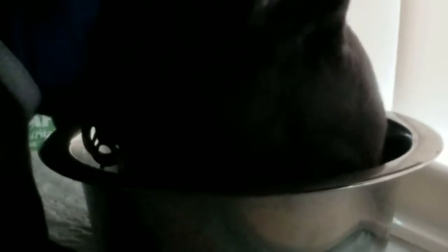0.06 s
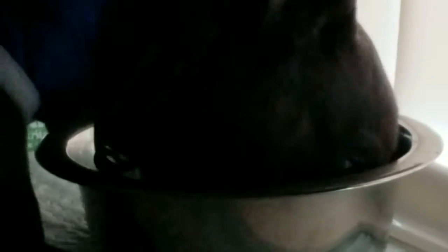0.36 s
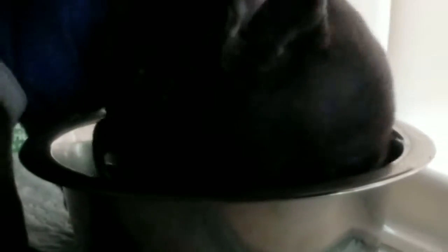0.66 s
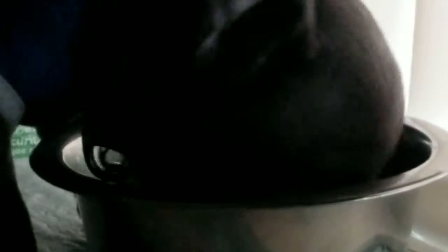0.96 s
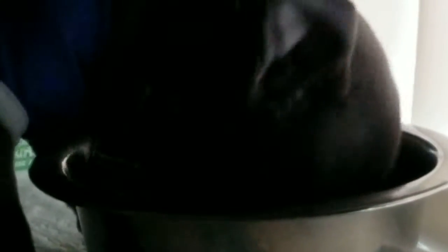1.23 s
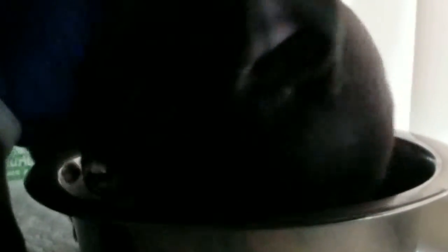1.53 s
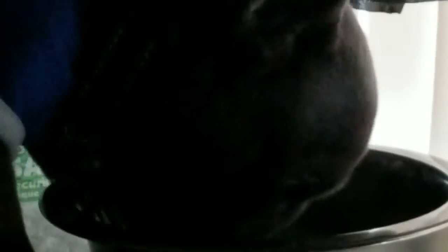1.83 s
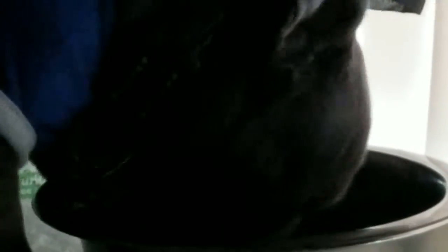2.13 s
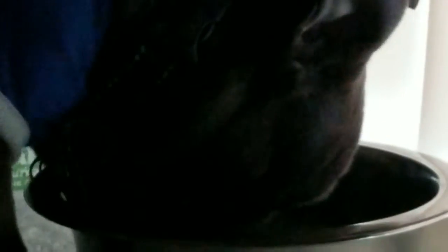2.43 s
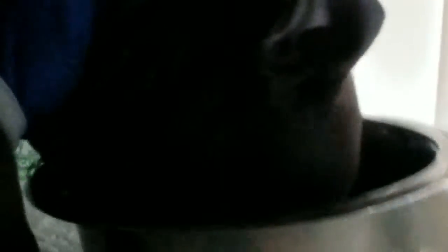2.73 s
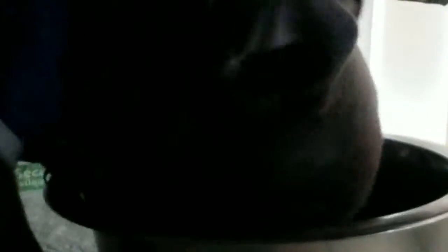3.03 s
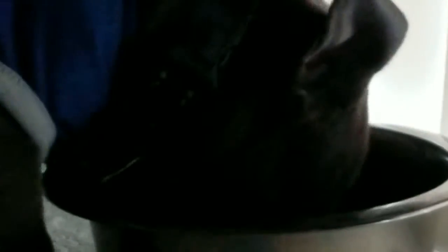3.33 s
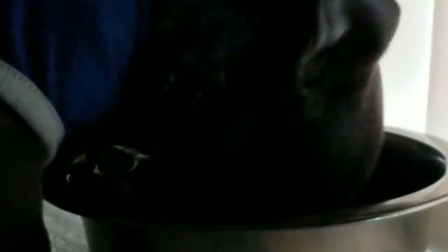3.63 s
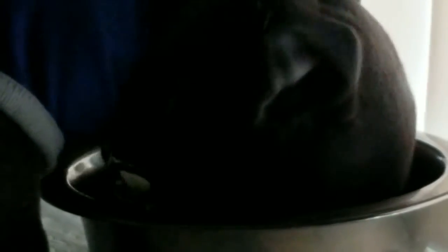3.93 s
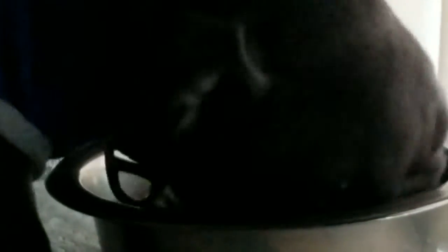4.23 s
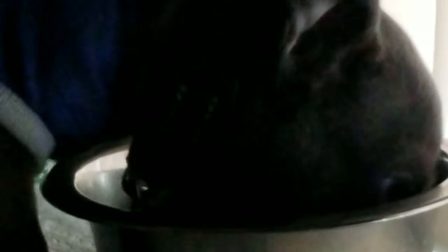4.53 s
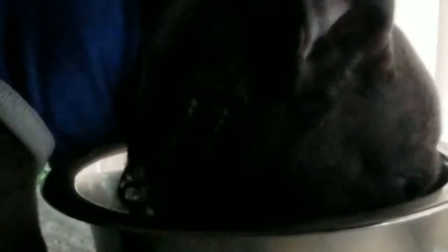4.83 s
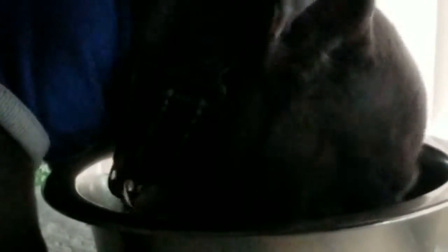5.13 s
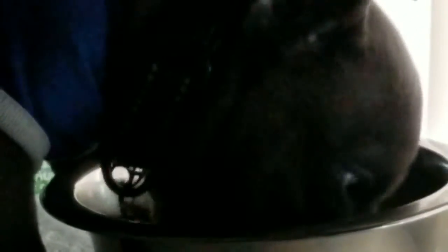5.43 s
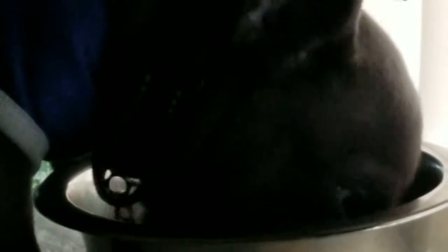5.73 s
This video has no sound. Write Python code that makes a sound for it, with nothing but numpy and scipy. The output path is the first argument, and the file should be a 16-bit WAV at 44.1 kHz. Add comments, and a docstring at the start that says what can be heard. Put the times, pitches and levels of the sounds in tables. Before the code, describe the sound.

In a small, quiet room, a dog laps and nudges food around a steel bowl right by the microphone. Light taps build to a bright clatter of teeth on metal, each knock ringing briefly. Bits of food crack between the teeth, with wet smacks and hollow plops, and then the eating goes on with softer clinks and scrapes.

```python
"""Dog eating from a steel bowl

A small room, with a stereo microphone close to a dog that eats fast from a stainless steel bowl.
Teeth and food clink and scrape on the steel, which rings briefly against the muzzle.
Lips and tongue make hollow plops and wet smacks, and bits of food crack between the teeth."""
import sys
import numpy as np
from scipy import signal
from scipy.fft import rfft, irfft
from scipy.io import wavfile

SR = 44100
rng = np.random.default_rng(int(sys.argv[2]) if len(sys.argv) > 2 else 0)


def dump_mix(stems):
    """Bounce the given channels to the path in sys.argv[1] as a 16-bit WAV at rate SR."""
    frames = np.atleast_2d(stems).T  # one column per channel
    limited = np.clip(frames, -1, 1)  # hard clip at full scale
    pcm = np.round(limited * 32767).astype(np.int16)
    wavfile.write(sys.argv[1], SR, pcm)


N = 254016
TIME = np.arange(N) / SR
RING_TIME = np.arange(SR * 3 // 4) / SR

# Knocks on the steel. Each row: start in seconds, relative clash and ring levels in dB,
# pitch in Hz that the struck spot favours.
KNOCKS = [(0.159, -54, -66, 950), (0.7461, -41, -43, 1940), (0.8003, -44, -39, 2750),
          (0.9073, -37.5, -37, 940), (1.1269, -47.5, -45, 2750), (1.219, -43.5, -40, 1940),
          (1.2978, -39.5, -37, 2750), (1.33, -38, -45, 955), (1.6093, -38.5, -45, 1950),
          (1.6229, -33.5, -27.5, 2230), (1.659, -24.5, -19, 1590), (1.6721, -21, -14, 1900),
          (1.7437, -25.5, -16, 1800), (1.7674, -26, -17, 1810), (1.7907, -25, -24.5, 2720),
          (1.8602, -25.5, -22, 2350), (1.9277, -36, -21.5, 970), (1.946, -26, -31, 2200),
          (2.0973, -38.5, -23.5, 1760), (2.2207, -26, -25, 940), (2.2394, -32, -17, 2220),
          (2.31, -28.5, -26, 1620), (2.8567, -52.5, -33, 2730), (3.4335, -36.5, -35, 920),
          (3.476, -41.5, -30.5, 1800), (3.513, -35, -33.5, 1980), (3.598, -41, -35, 1940),
          (3.663, -36, -26, 1790), (3.7118, -27, -22.5, 1800), (4.0435, -48, -47, 1940),
          (4.3896, -40.5, -25.5, 1810), (4.455, -51, -37, 2600), (4.7648, -40.5, -52, 1940),
          (4.876, -40.5, -38.5, 1800), (5.3261, -37, -50, 2150), (5.3606, -39, -51, 950),
          (5.411, -52, -33, 2750), (5.509, -39.5, -37.5, 1090), (5.583, -45, -44, 1930),
          (5.6436, -43.5, -36, 1940)]
# Modes of the bowl. Each row: frequency in Hz, relative level in dB, t60 in seconds before damping.
BOWL_MODES = [(786.8, 3.5, 0.16), (1005, -19.5, 1), (1126, 0, 0.56), (1939, 0.5, 0.46), (1972, -25, 0.48),
              (1987, -14.5, 0.43), (2563, -1.5, 0.22), (2685, 2, 0.064), (2906, -17, 0.37),
              (3040, -9.5, 0.3), (4000, -29, 1), (4790, -25, 0.71), (5405, -21.5, 0.29), (5480, -27, 0.57),
              (5810, -23, 0.29), (6403, -18, 0.075), (7050, -22.5, .25), (9440, -14.5, 0.12),
              (9748, -14.5, 0.14), (10200, -30, 0.13), (10730, -19.5, 0.29), (10740, -16, 0.4),
              (11418, -33, .2), (14862, -29, 0.14)]
# Hollow of the mouth inside the bowl. Each row: frequency in Hz, relative level in dB.
MOUTH_SPECTRUM = [(120, -23.5), (280, -15), (450, -21), (620, 3), (820, 12), (1200, -1), (2000, -5),
                  (3100, -20.5), (4200, -8), (8000, -18.5), (16000, -50.5)]


def bowl(rub_db=-5, grit_db=-3, lowest_hz=300):
    """Knocks and food pushed along the wall excite the same bowl; its sound carries little bass."""
    # The muzzle shoves food along the steel. Each row: start and length in seconds,
    # relative rubbing and grit levels in dB.
    shoves = [(0.0, 0.037, -62, -69), (0.19, 0.031, -58, -60), (0.48, 0.19, -70, -56),
              (0.747, 0.1, -48, -54), (0.892, 0.056, -43.5, -49.5), (1.114, 0.052, -51, -52),
              (1.253, 0.15, -50, -54), (1.591, 0.056, -46, -39), (1.655, 0.21, -38, -35),
              (1.859, .11, -35, -41), (2.083, 0.039, -40, -43), (2.206, 0.031, -28.5, -27.5),
              (2.28, 0.056, -38.5, -53), (2.6, .09, -52, -61), (2.799, 0.076, -49, -52),
              (2.993, 0.081, -54, -55.5), (3.175, 0.066, -47.5, -55), (3.457, 0.12, -45.5, -46.5),
              (3.668, .14, -38.5, -43.5), (3.879, 0.031, -55, -47.5), (4.037, 0.074, -51, -52.5),
              (4.187, 0.11, -45.5, -49.5), (4.379, 0.066, -40.5, -57), (4.51, 0.047, -49.5, -64),
              (4.758, .05, -48, -49), (4.862, 0.053, -54.5, -54), (5.31, .09, -44.5, -47),
              (5.497, .14, -48, -58.5)]
    start, length, rub, grit = np.transpose(shoves)
    rolling = strokes(zip(start, length, grit), rise_s=0.021, ease_db_s=24, release_s=0.048, rest_db=-68)
    sliding = strokes(zip(start, length, rub), rise_s=0.023, ease_db_s=23, release_s=0.051, rest_db=-75.5)
    force = tooth_knocks() + amp(grit_db) * rolling * grains(1800, 5.6)
    sound = ring() + clash(force) + amp(rub_db) * sliding * rubbing()
    return signal.sosfilt(signal.butter(4, lowest_hz, "high", fs=SR, output="sos"), sound)


def tooth_knocks(gain_db=-4, chatter_s=0.0094, bite=1.9, bite_s=0.0006):
    """A tooth meets the steel sharply and chatters on it for a moment."""
    push = np.zeros(N)
    contact = np.exp(-RING_TIME / chatter_s) + bite * np.exp(-RING_TIME / bite_s)
    for start, db, *_ in KNOCKS:
        add(push, start, amp(db + gain_db) * contact)
    return push * grains(9000, 4.5)


def ring(gain_db=-1, rise_s=0.0031, shimmer=0.34, hard_db=-24, favour_db=12, favour_octaves=0.32):
    """Knocks pour energy into the bowl's modes; the shifting muzzle makes each one waver."""
    # The muzzle presses on the bowl and chokes it. Each row: time in seconds, extra loss in dB a second.
    grip = [(2.3, 11), (2.42, 150), (3.3, 150), (3.42, 4)]
    grip_losses = [np.cumsum(np.interp(start + RING_TIME, *np.transpose(grip))) / SR
                   for start, *_ in KNOCKS]
    out = np.zeros(N)
    waver, slip = flutter(18), flutter(18)
    attack = 1 - np.exp(-RING_TIME / rise_s)
    luck = rng.uniform(-1, 1, (len(KNOCKS), len(BOWL_MODES)))
    for k, (hz, db, t60) in enumerate(BOWL_MODES):
        energy = np.zeros(N)
        for knock, chance, loss_db in zip(KNOCKS, luck[:, k], grip_losses):
            start, clash_db, ring_db, favoured_hz = knock
            # A soft touch barely wakes the high modes, and the lips stay on the wall and damp it.
            softness_db = max(hard_db - clash_db, 0)
            high_db = clash_db - 0.47 * softness_db
            damped_t60 = t60 / (1.5 + 0.38 * softness_db)
            favour = np.exp(-(np.log2(hz / favoured_hz) / favour_octaves) ** 2)
            strength_db = ring_db - favour_db * (1 - favour) if hz < 3500 else high_db
            # Higher modes depend more on the spot struck.
            strength_db += 1.5 * chance * np.log2(hz / BOWL_MODES[0][0])
            envelope = attack * amp(strength_db - loss_db - 60 * RING_TIME / damped_t60)
            add(energy, start, envelope ** 2)
        shift = rng.integers(N)
        swing = np.sin(2 * np.pi * hz * TIME + .5 * np.roll(slip, shift))
        out += amp(db + gain_db) * np.sqrt(energy) * np.exp(shimmer * np.roll(waver, shift)) * swing
    return out


def clash(force, t60=0.091, direct=0.84, tink_gain=0.47, spot_count=8):
    """Each spot of the bowl answers a force with its own crowd of modes and a bright tink."""
    # The bowl's crowd of short-lived modes. Each row: frequency in Hz, relative level in dB.
    crowd_spectrum = [(220, -26.5), (350, -13), (750, 5), (1300, 12), (1700, 6), (2700, 8), (3600, 2.5),
                      (6000, -8), (7700, 3), (8600, -4), (9400, -3.5), (11200, 8.5), (12800, 2),
                      (14500, -5), (16000, 7)]
    tink_spectrum = [(2000, -12.5), (2600, -3.5), (4000, -12), (5400, 7), (6400, 11), (7500, -2),
                     (15000, -5)]
    spot, out, size = touched_spots(spot_count), np.zeros(N), len(RING_TIME)
    for k in range(spot_count):
        dying_noise = unit(rng.standard_normal(size) * amp(-60 * RING_TIME / t60))
        strike = direct * signal.unit_impulse(size) + dying_noise
        crowd = unit(signal.fftconvolve(strike, colour(crowd_spectrum)))[:size]
        tink = damped_steel(tink_spectrum, damped_s=0.02, vary_db=4)
        out += through(force * (spot == k), crowd + tink_gain * tink)
    return out / np.hypot(tink_gain, 1)


def rubbing(spot_count=4):
    """Tongue and food slip along the steel and favour its middle modes."""
    spot, slips = touched_spots(spot_count), grains(900, 2.9)
    spectrum = [(800, -7.5), (1125, -11.5), (1940, 0.5), (2600, -1.5), (3100, -8), (10000, -6)]
    return sum(through(slips * (spot == k), damped_steel(spectrum, damped_s=0.025, vary_db=3.5))
               for k in range(spot_count))


def damped_steel(spectrum, damped_s, vary_db):
    """The modes as they answer at one spot, weighted by (Hz, dB) points and damped by the muzzle."""
    modes = np.array([amp(db - 60 * RING_TIME / t60) * np.sin(2 * np.pi * hz * RING_TIME)
                      for hz, db, t60 in BOWL_MODES])
    mode_hz = np.array(BOWL_MODES)[:, 0]
    weights = amp(curve(spectrum, mode_hz) + vary_db * rng.standard_normal(len(modes)))
    weights *= rng.choice([-1, 1], len(modes))
    return unit(weights @ modes * np.exp(-RING_TIME / damped_s))


def touched_spots(count, changes_per_s=25):
    """Which of several spots of the bowl is being touched at each moment."""
    return rng.integers(0, count, N)[(TIME * changes_per_s).astype(int)]


def plops(gain_db=1.5, width_s=0.0012, lead_s=0.00211, sag=0.029, ring_s=0.0075,
          slosh_s=0.045, slosh_hz=700, lag_s=0.011):
    """A pocket of air opens in the mouth: a few cycles of falling pitch, then a wet slosh."""
    # Plops of lips and tongue. Each row: time in seconds, relative level in dB, centre pitch in Hz.
    pockets = [(0.045, -46.5, 738), (0.463, -48, 717), (0.562, -35, 735), (0.568, -40, 802),
               (0.659, -28.5, 740), (0.861, -43, 780), (1.566, -41, 756), (2.621, -37.5, 1020),
               (2.974, -28, 748), (3.418, -32, 873), (3.859, -28.5, 835), (4.09, -43.5, 810),
               (4.165, -34.5, 735), (4.739, -39, 736), (4.864, -37, 740), (5.265, -43, 936)]
    tones, slosh = np.zeros(N), np.zeros(N)
    from_peak = RING_TIME - 2 * lead_s
    swell = np.exp(-.5 * (from_peak / width_s) ** 2)
    tail = 0.17 * (from_peak > 0) * np.exp(-abs(from_peak) / ring_s)
    for at, db, hz in pockets:
        pitch = hz * (1 - sag * np.tanh(from_peak / width_s))
        tone = np.sin(2 * np.pi * np.cumsum(pitch) / SR)
        add(tones, at - lead_s, amp(db + gain_db) * (swell + tail) * tone)
        add(slosh, at + lag_s, 0.1 * amp(db) * np.exp(-RING_TIME / slosh_s))
    hollow = signal.butter(3, [slosh_hz / 1.4, slosh_hz * 1.4], "band", fs=SR, output="sos")
    return tones + slosh * evened(signal.sosfilt(hollow, grains(500, 3.3)))


def cracks(body_gain_db=-3, snap_gain_db=-4, body_s=0.0039, snap_s=0.0018, crumble_s=0.018, jaw=0.44):
    """Food gives way within a millisecond: a snap, a short resonance of the mouth, a trail of crumbs."""
    # Cracks and wet smacks. Each row: start in seconds, relative body level in dB,
    # mouth resonance in Hz, relative snap level in dB.
    bites = [(0.2072, -57, 1040, -47.5), (0.4691, -60, 1960, -43), (0.9472, -48, 2780, -38.5),
             (1.9676, -28.5, 2840, -50), (2.6219, -29, 1780, -46), (2.6913, -35.5, 2660, -38.5),
             (2.806, -40.5, 3080, -45.5), (3.0166, -36, 2930, -46), (3.1417, -40.5, 1540, -47),
             (3.1851, -39, 1760, -47), (3.2227, -40, 1040, -54), (3.282, -43.5, 1920, -44),
             (3.3772, -39.5, 1680, -49), (3.697, -36.5, 1250, -51), (3.911, -40, 1784, -44),
             (4.1697, -41, 1490, -42), (4.188, -53, 1550, -39.5), (4.2054, -41.5, 2500, -42.5),
             (4.5183, -35, 2570, -36.5), (4.5523, -41, 2600, -44), (4.668, -49, 1300, -51),
             (5.0626, -51, 2800, -57), (5.3138, -38.5, 1440, -47), (5.4334, -45, 1120, -44.5)]
    # The snap of the food. Each row: frequency in Hz, relative level in dB.
    snap_spectrum = [(300, -6.5), (900, -20), (3000, 0), (6000, -3), (8600, -4.5), (11000, 1.5),
                     (16000, -20)]
    body, snap, chew = np.zeros((3, N))
    t = RING_TIME[:SR // 8]
    crumbs = 0.3 * np.exp(-t / crumble_s)
    give = 1 - np.exp(-t / .0008)
    for start, body_db, hz, snap_db in bites:
        cavity = signal.iirpeak(hz, Q=2.34, fs=SR)
        noise = rng.standard_normal(len(t) + 500)  # 500 samples let the resonance build
        hollow = evened(signal.lfilter(*cavity, signal.lfilter(*cavity, noise)))[500:]
        burst = amp(body_db + body_gain_db) * give * (np.exp(-t / body_s) + crumbs)
        add(body, start, hollow * burst)
        add(chew, start, jaw * burst)
        add(snap, start, amp(snap_db + snap_gain_db) * give * (np.exp(-t / snap_s) + crumbs))
    chewing = through(chew * grains(4000, 1.8), colour(MOUTH_SPECTRUM))
    snapping = through(snap * grains(13000, 2.4), colour(snap_spectrum))
    return body + chewing + snapping


def tongue(lap_db=-4.5, smack_db=-11, decay_cycles=1.55, clump_db=5):
    """Wet lapping in clumps: clicks in the hollow of the muzzle, and films of saliva that burst."""
    # Laps of the tongue. Each row: start and length in seconds, relative level in dB.
    laps = [(0.04, 0.16, -62), (0.46, 0.022, -63), (0.57, 0.15, -50), (0.9, 0.19, -50),
            (1.12, 0.035, -51.5), (1.27, 0.081, -50.5), (1.56, 0.027, -50.5), (2.29, 0.053, -49),
            (2.62, 0.03, -51), (2.81, 0.11, -54.5), (2.98, 0.15, -49), (3.42, .13, -45.5),
            (3.72, 0.19, -47), (4.05, 0.45, -52.5), (4.38, 0.076, -44.5), (4.58, 0.13, -52.5),
            (4.75, 0.05, -47.5), (4.86, 0.13, -53.5), (5.02, 0.076, -59.5), (5.32, 0.056, -47.5),
            (5.52, .12, -55.5)]
    effort = strokes(laps, rise_s=0.0088, ease_db_s=17.5, release_s=0.076, rest_db=-66.5)
    t, smacks = RING_TIME[:SR // 50], np.zeros(N)
    for hz in np.geomspace(600, 3200, 10):
        pop = unit(np.sin(2 * np.pi * hz * t) * t * np.exp(-t * hz / decay_cycles))
        smacks += through(grains(25, 1.6), pop) / np.sqrt(hz)
    clumps = evened(amp(clump_db * np.tanh(flutter(30))))
    lapping = through(grains(550, 1.96), colour(MOUTH_SPECTRUM)) * clumps
    return effort * (amp(lap_db) * lapping + amp(smack_db) * evened(smacks))


def room(x, wet_db, gap_s=0.0043, build_s=0.0036):
    """The close walls answer after a short gap; the highest treble dies first."""
    # Reverberation of the small room. Each row: frequency in Hz, t60 in seconds.
    decay_times = [(200, 0.26), (700, 0.34), (2500, 0.62), (8000, 0.59), (16000, 0.16)]
    hz, t, spectra = signal.stft(rng.standard_normal(len(RING_TIME)), SR, nperseg=256)
    decay = amp(-60 * t / curve(decay_times, hz)[:, None])
    tail = signal.istft(spectra * decay, SR, nperseg=256)[1][:len(RING_TIME)]
    onset = np.clip((RING_TIME - gap_s) / build_s, 0, 1)
    return x + amp(wet_db) * through(x, unit(tail * onset))


def scattered(x, delay_s=.014):
    """Each frequency reaches the microphone by a detour of its own length."""
    detour = delay_s * abs(flutter(363)[:N // 2 + 1])
    return shaded(x, lambda hz: np.exp(-2j * np.pi * np.cumsum(detour) * hz[1]))


def room_tone(gain_db=-69):
    """The faint rumble and hiss of the room."""
    # The quiet room. Each row: frequency in Hz, relative level in dB.
    spectrum = [(15, -4), (30, -12), (55, 4.5), (90, 0.5), (130, -2.5), (200, -19), (400, -13.5),
                (700, -12), (1500, -38), (3300, -26.5), (7500, -16), (9500, -22), (16000, -25.5)]
    return amp(gain_db) * evened(shaded(rng.standard_normal(N), lambda hz: amp(curve(spectrum, hz))))


def strokes(rows, rise_s, ease_db_s, release_s, rest_db):
    """Pressure of (start, length, dB) strokes: each builds, eases and lets go to a light touch."""
    power, t = np.full(N, amp(rest_db) ** 2), RING_TIME
    for start, length, db in rows:
        shape = np.minimum(t / rise_s, 1) * np.exp(-np.maximum(t - length, 0) / release_s)
        add(power, start, (amp(db - ease_db_s * t) * shape) ** 2)
    return np.sqrt(power)


def grains(per_s, spread_db):
    """Random tiny contacts, mostly small and a few large."""
    size = amp(spread_db * np.minimum(rng.exponential(1, N), 3))
    return evened(size * rng.choice([-1, 1], N) * (rng.random(N) < per_s / SR))


def flutter(width_hz):
    """Smooth random wander of rms one."""
    return evened(shaded(rng.standard_normal(N), lambda hz: np.exp(-(hz / width_hz) ** 2)))


def colour(points, size=2048):
    """Causal impulse response of unit energy with a spectrum of (Hz, dB) points."""
    log_gain = np.log(amp(curve(points, abs(np.fft.fftfreq(size, 1 / SR)))))
    minimum_phase = np.exp(np.conj(signal.hilbert(log_gain)))
    return unit(np.fft.ifft(minimum_phase).real[:size // 2])


def shaded(x, gain):
    """Applies a gain given as a function of frequency."""
    return irfft(rfft(x) * gain(np.fft.rfftfreq(N, 1 / SR)), N)


def through(x, response):
    """Plays x through an impulse response."""
    return signal.fftconvolve(x, response)[:N]


def curve(points, hz):
    """Joins (Hz, value) points on a log-frequency axis."""
    point_hz, value = np.transpose(points)
    return np.interp(np.log(hz + 1), np.log(point_hz), value)


def add(mix, start_s, sound):
    """Mixes a sound in at its start time."""
    part = mix[max(round(start_s * SR), 0):][:len(sound)]
    part += sound[:len(part)]


def amp(db):
    """Decibels to gain."""
    return 10 ** (np.asarray(db) / 20)


def evened(x):
    """Scales to an rms of one."""
    return x / np.sqrt(np.mean(x ** 2) + 1e-20)


def unit(x):
    """Scales to an energy of one."""
    return x / np.linalg.norm(x)


def scene():
    """The dog eats just ahead of the microphone; nearby surfaces scatter differently to each side."""
    # Stereo width. Each row: frequency in Hz, side gain in dB.
    width = [(60, -14.5), (500, -21.5), (1250, -15.5), (2000, -14.5), (2700, -11), (4500, -11.5),
             (8000, -13.5), (14000, -9.5)]
    # Balance at the microphone. Each row: frequency in Hz, left minus right in dB.
    lean = [(60, -1), (500, 0.5), (2000, 0.5), (4500, 1.1), (8000, 3), (13000, 1)]
    mid = room(bowl() + cracks() + tongue(), wet_db=-8) + room(plops(), wet_db=-9)
    side = shaded(scattered(mid) + room_tone(), lambda hz: amp(curve(width, hz)))
    mid = mid + room_tone()
    return np.array([shaded(mid + sign * side, lambda hz: amp(sign * curve(lean, hz) / 2))
                     for sign in (1, -1)])


def record(dry):
    """The recorder's band limit cuts the highest treble."""
    edge_hz = 15950
    lowpass = signal.firwin(511, edge_hz, window=("kaiser", 9), fs=SR)
    return signal.oaconvolve(dry, lowpass[None], "same")


dry = scene()
out = record(dry)
dump_mix(out)
```